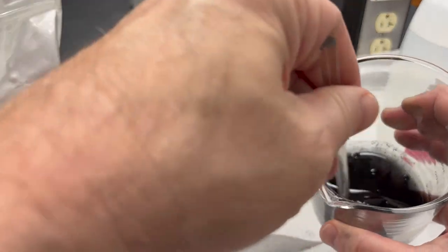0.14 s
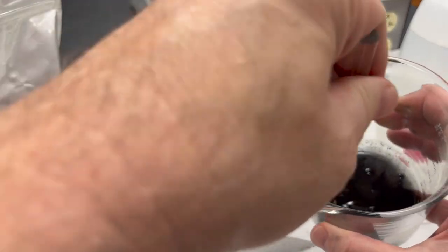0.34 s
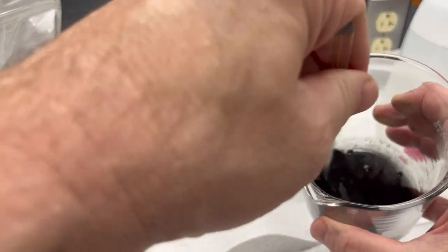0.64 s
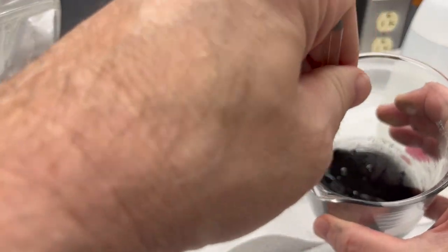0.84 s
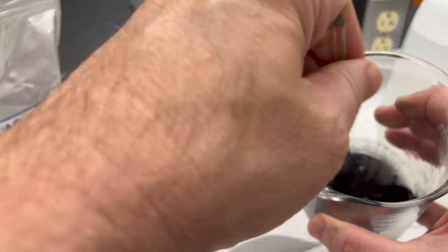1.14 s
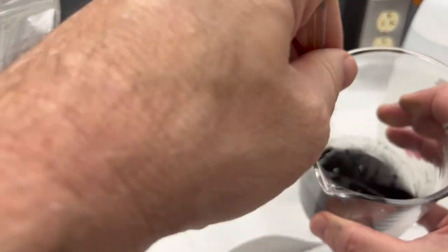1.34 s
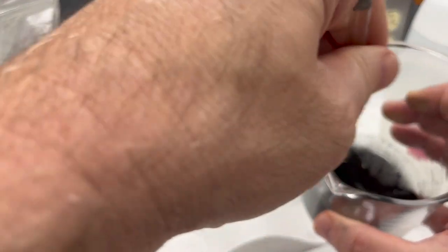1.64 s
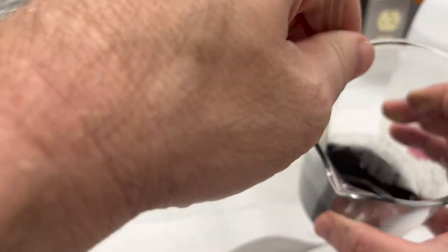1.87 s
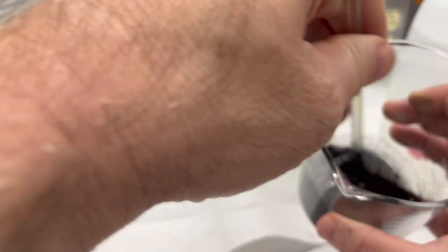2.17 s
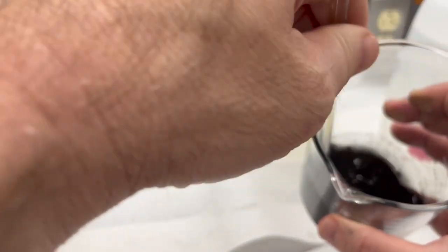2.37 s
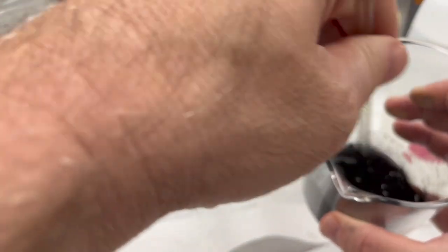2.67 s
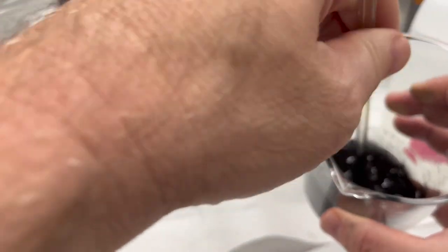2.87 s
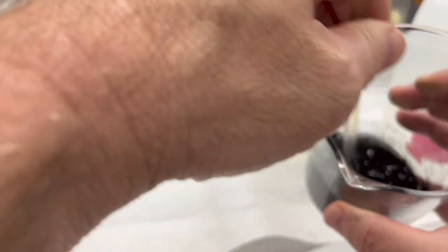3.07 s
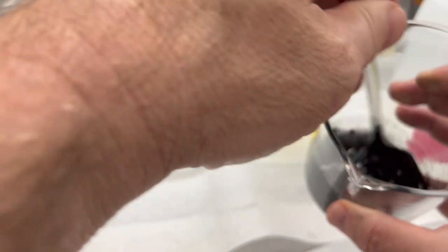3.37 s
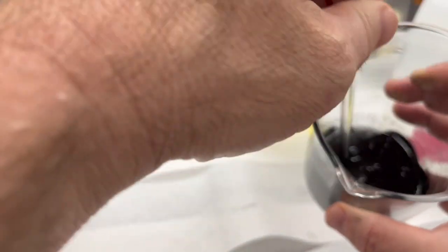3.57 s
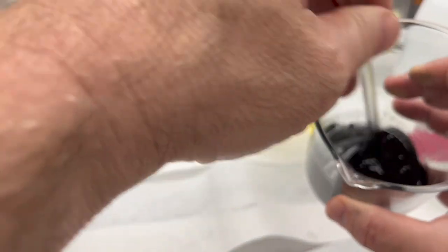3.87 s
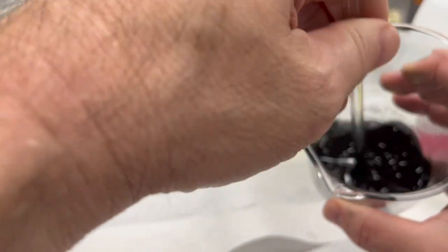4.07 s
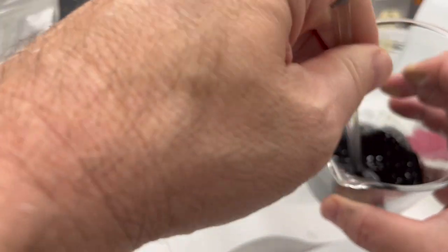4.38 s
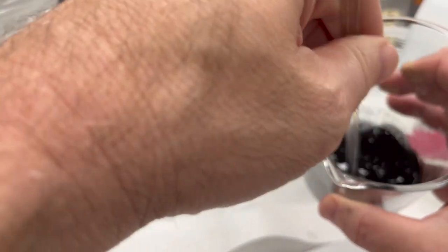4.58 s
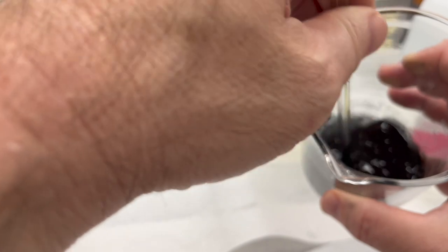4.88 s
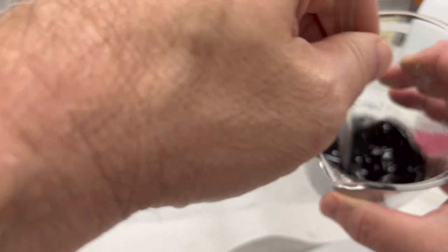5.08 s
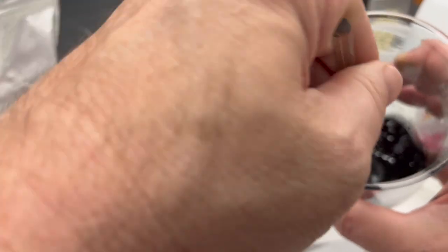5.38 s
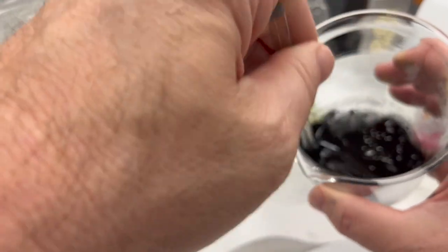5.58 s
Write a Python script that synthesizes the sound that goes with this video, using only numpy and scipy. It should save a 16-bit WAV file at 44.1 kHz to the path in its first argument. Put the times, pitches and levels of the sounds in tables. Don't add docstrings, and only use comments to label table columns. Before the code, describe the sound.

Close up in a hard-walled lab room, a thin metal stirrer barely rubs in oil, with a few faint ticks on a small glass beaker. After a second the clinks become frequent and irregular, then steady pairs of bright taps about four times a second, with soft wet scraping between. They end in a last cluster and a rubbing drag. A phone picks up low ventilation and a weak mains hum behind.

```python
import sys
import numpy as np
from scipy import signal
from scipy.fft import rfft, irfft
from scipy.io import wavfile
from scipy.ndimage import uniform_filter1d

SR = 44100
rng = np.random.default_rng(int(sys.argv[2]) if len(sys.argv) > 2 else 0)


def persist_wave(psi):
    counts = np.round(np.clip(psi, -1, 1) * 32767).astype(np.int16)
    wavfile.write(sys.argv[1], SR, np.atleast_2d(counts).T)


def natural_amplitude(level_db):
    exponent = np.asarray(level_db, float) / 20
    return 10 ** exponent


N = 252252

# f/Hz, time to fall 60 dB/s, left minus right level/dB, left lead/rad
BELL = (623, .15, -7.5, .2)
BELL_SPLIT_HZ, BELL_TWIN = 10.5, 0.9
# f/Hz, time to fall 60 dB/s, level against the bell/dB
THUD = (330, 0.016, -26)


def taps(bell_db=6, swell_s=0.00028, early_s=0.0006, bell_drift=0.009, small_hz=800):
    size, rows = 8192, tap_rows()
    t = np.arange(size) / SR
    swell = (1 - np.exp(-t / swell_s)) ** 2
    hz = (BELL[0] - BELL_SPLIT_HZ / 2) * (1 + bell_drift * rng.standard_normal(len(rows)))
    beating = (1 + BELL_TWIN * np.exp(2j * np.pi * BELL_SPLIT_HZ * t)) / 2
    bell = (rings(hz, *BELL[1:], size) * beating).imag * swell
    thud = rings(np.array([THUD[0]]), THUD[1], 0, 0, size).imag
    bell = bell + natural_amplitude(THUD[2]) * thud
    glass = wall_modes(size=1600)
    clinks, bells = np.zeros((2, 2, N + size))
    for k, (s, ring_db, tap_db, spot) in enumerate(rows):
        start = int((s - early_s) * SR)
        clink = wall(tap_db, spot, *glass)
        bells[:, start:start + size] += natural_amplitude(bell_db + ring_db) * bell[:, k]
        clinks[:, start:start + clink.shape[1]] += clink
    clinks = signal.sosfilt(signal.butter(2, small_hz, "high", fs=SR, output="sos"), clinks)
    return (clinks + bells)[:, :N]


# t/s, wall level/dB, bell level/dB, hardness/dB, ring f/Hz
RIM_TAPS = [
    (0.4031, -34.5, -42, 12, 2620),
    (0.7352, -36, -53, -4, 2640),
    (1.2924, -30, -48.5, -9, 2650),
    (3.379, -23.5, -73, -8.5, 3120),
    (5.5155, -38, -58, 10, 6530),
]
LIP_TAPS = [
    (1.2727, -22, -51, 0, 3060),
    (1.439, -28, -40.5, 11, 2900),
    (1.793, -22, -52, 0, 2860),
    (1.9629, -26.5, -62, 7, 3090),
    (5.119, -31.5, -39, 15, 2680),
]
WET_TAPS = [
    (0.2807, -35.5, -53, -22, 2520),
    (3.1267, -21.5, -34, 0.5, 3100),
    (3.3758, -21, -32, 3, 2350),
    (3.6285, -18.5, -34.5, -1, 3090),
    (4.4315, -14, -29.5, 2.5, 2330),
    (4.66, -21.5, -33.5, -1.5, 3050),
    (4.8911, -21.5, -33.5, 0, 3100),
]
PASTE_TAPS = [
    (1.0886, -46.5, -59, -19.5, 2250),
    (1.6372, -29, -42, -15.5, 3170),
    (1.9687, -23.5, -25.5, 13, 2920),
    (3.8327, -26.5, -38, 0, 2380),
    (4.1288, -24.5, -33, -4.5, 2400),
    (5.0219, -39, -51, -15.5, 3100),
]
LOW_TAPS = [(1.172, -25, -37, -1.5, 3050), (1.6866, -24, -31, 7, 2930), (1.8256, -23.5, -28.5, -10, 2650),
            (2.214, -21.5, -32, 1, 2790), (2.4644, -22.5, -30.5, 1, 3030), (2.7095, -21.5, -35.5, -2, 2640),
            (2.9575, -33, -45, 0.5, 3040), (3.1819, -23.5, -32, -3.5, 3230),
            (3.4046, -23.5, -33.5, -5.5, 6560), (3.6606, -21, -28.5, -0.5, 3040),
            (3.914, -22.5, -32, 0, 2850), (4.2675, -38, -41, -7, 2960), (4.7246, -26, -37, -8.5, 3070),
            (4.9778, -22.5, -30, 3.5, 2640)]
# t/s, wall level/dB, hardness/dB
TOUCHES = [(0.038, -64, -10), (0.811, -76, 15), (0.879, -76, 15), (0.905, -73.5, 13), (0.981, -79, 20),
           (1.037, -91, 4), (1.5834, -49.5, -9), (2.1448, -55, 10), (2.2934, -53, -14), (2.9042, -58, 4),
           (3.0338, -57, 8), (3.267, -49, -2), (3.328, -65, 8), (3.5223, -51.5, -8), (3.5582, -57, 3.5),
           (3.7435, -47.5, -2), (4.2017, -57, -10.5), (4.223, -62, 11), (4.591, -58, -13),
           (4.8282, -63.5, 7)]
TOUCH_BELL_DB, TOUCH_HZ = -11, 3100
# low wall, high wall, rod level against middle wall/dB, left minus right level/dB
SPOT_DB = [
    (-12, 4.5, 2, 1.5),
    (-10, 5, 1, 1.5),
    (-22, -10, -13, 0),
    (-9.5, -7, -14.5, 1.5),
    (-5.5, 2, -2.5, 0),
    (-10, -7, -6.5, 3),
]
# low f/Hz, high f/Hz, rod f/Hz, and its rattle length/ms
SPOT_HZ = [
    (1900, 5770, 9520, 3.3),
    (1600, 4750, 10500, 3.52),
    (2050, 3000, 9500, 3.76),
    (1950, 2600, 9500, 2.74),
    (1500, 4750, 9200, 3.26),
    (2000, 2200, 10000, 2.9),
]
HARDNESS_SHARE = [0.15, 0.11, 0.39, 0.87]


def tap_rows():
    touches = [(s, db, db + TOUCH_BELL_DB, hard_db, TOUCH_HZ) for s, db, hard_db in TOUCHES]
    kinds = RIM_TAPS, LIP_TAPS, WET_TAPS, PASTE_TAPS, LOW_TAPS, touches
    rows = []
    for kind, spot_db, spot_hz in zip(kinds, SPOT_DB, SPOT_HZ):
        low, high, rod, pan_db = spot_db
        low_hz, high_hz, rod_hz, rattle_ms = spot_hz
        for s, db, ring_db, hard_db, hz in kind:
            tap_db = db + np.array([low, 0, high, rod]) + hard_db * np.array(HARDNESS_SHARE)
            rows.append((s, ring_db, tap_db, (low_hz, hz, high_hz, rod_hz, rattle_ms, pan_db)))
    return rows


RING_DB, RING_REACH = 14, 0.09


def wall(tap_db, spot, hz, family, modes, favour_db=3, reach=0.13, chance_db=0.5, turn=0.96, lean_db=-1.2):
    *favoured_hz, rattle_ms, pan_db = spot
    chance = rng.standard_normal((3, len(hz)))
    favour = favour_db * np.exp(-(np.log(hz[:, None] / favoured_hz) / reach) ** 2).max(axis=1)
    favour = favour + RING_DB * np.exp(-(np.log(hz / favoured_hz[1]) / RING_REACH) ** 2)
    share = natural_amplitude(favour + chance_db * chance[0]) * np.exp(1j * turn * chance[1:])
    member = family == np.arange(4)[:, None]
    groups = np.einsum("km,pm,pmt->kpt", member, share, modes, optimize=True).imag
    groups = signal.fftconvolve(groups, chatter(rattle_ms, size=900)[None], axes=2)
    groups = groups / np.sqrt(np.sum(groups ** 2, axis=(1, 2), keepdims=True) / 400)
    pan = natural_amplitude((pan_db + lean_db) * np.array([[0.5], [-0.5]]))
    return np.tensordot(natural_amplitude(tap_db), groups, axes=1) * pan


SCATTER_TOP_HZ = 5000


def chatter(rattle_ms, size, density=0.27, rise_s=0.00096, stretch=0.97, spread_db=3.0,
            scatter_db=-10, scatter_s=0.0057):
    t, chance = np.arange(size) / SR, rng.standard_normal((2, size))
    contacts = (rng.random(size) < density) * np.sign(chance[0]) * natural_amplitude(spread_db * np.abs(chance[0]))
    contacts = contacts * np.exp(-(1000 * t / (stretch * rattle_ms)) ** 4)
    soft = signal.butter(2, SCATTER_TOP_HZ, fs=SR, output="sos")
    tail = natural_amplitude(scatter_db) * np.exp(-t / scatter_s) * signal.sosfilt(soft, chance[1])
    return (contacts + tail)[None] * (1 - np.exp(-t / rise_s))


# f/Hz, level/dB, time to fall 60 dB/s
MODES = [(1010, -9, 0.025), (1435, -1.5, 0.016), (1561, 7.5, 0.01), (1696, -11.5, 0.031),
         (2220, -4.5, 0.0037), (2230, -1.5, 0.004), (2520, 2, 0.015), (2562, -8, 0.075), (2670, 9, 0.12),
         (3060, -8, .018), (3090, 12, 0.012), (3042, 2.5, 0.072), (3940, 0, 0.06), (4370, -10, 0.01),
         (4696, 0.5, 0.02), (4920, -6, 0.03), (5230, -14.5, 0.045), (5910, 3, 0.012), (6510, -8, 0.012),
         (7040, -3, 0.021), (7105, -2, 0.018), (9370, -1.5, 0.0089), (10020, 3, 0.004), (11280, -3, 0.017),
         (13700, -14.5, 0.0067), (13350, 2, 0.019)]
FAMILY_EDGES_HZ = [900, 2050, 4000, 7700, 16000]
# lowest f/Hz, highest f/Hz, level/dB
CROWD = (950, 14800, -8)
CROWD_T60_S, MOST_CYCLES = 0.004, 80
# f/Hz, left minus right level/dB
PORT_BALANCE = [(60, -0.5), (110, 0.0), (200, -0.5), (380, -2.0), (700, -13.5), (1290, -2), (2380, 0),
                (4400, 8), (8120, -8), (15000, -1.5)]
# f/Hz, left lead/rad
PORT_PHASE = [(0, 0), (1890, -0.6), (2410, 0.9), (3960, -0.2), (4570, 0.9), (5510, -3.2), (6030, -2.5),
              (6890, -8.0), (9130, -10.9), (9910, -10.6), (10600, -12.1), (12400, -12.7), (15200, -15.6),
              (16700, -15.8)]


def wall_modes(size, count=36):
    hz, db, t60 = np.transpose(MODES)
    t60 = np.append(np.minimum(t60, MOST_CYCLES / hz), np.full(count, CROWD_T60_S))
    hz = np.append(hz, np.geomspace(*CROWD[:2], count))
    db = np.append(db, np.full(count, CROWD[2]))
    lead = np.interp(hz, *np.transpose(PORT_PHASE))
    ring = rings(hz, t60, on_log(PORT_BALANCE, hz), lead, size)
    family = np.searchsorted(FAMILY_EDGES_HZ[1:-1], hz)
    for k in range(4):
        edges = [0.9 * FAMILY_EDGES_HZ[k], 1.1 * FAMILY_EDGES_HZ[k + 1]]
        band = signal.butter(2, edges, "bandpass", fs=SR, output="sos")
        ring[:, family == k] = signal.sosfilt(band, ring[:, family == k])
    return hz, family, natural_amplitude(db)[:, None] * ring


def rings(hz, t60, balance_db, lead, size):
    ring = np.exp(np.outer(2j * np.pi * hz - np.log(1000) / t60, np.arange(size) / SR))
    side = np.array([[0.5], [-0.5]])
    return (natural_amplitude(side * balance_db) * np.exp(1j * side * lead))[..., None] * ring


# t/s, pressure level/dB, dryness/dB
STIR = [(0.0, -72, -12), (0.13, -78.5, 4), (0.2, -72, 7.5), (0.36, -71, -4.5), (0.561, -91.5, -14.5),
        (0.72, -77.5, 0), (0.8, -77, 16), (1.16, -71, -3.5), (1.309, -70.5, 6.5), (1.89, -63, -1),
        (2.83, -65.5, 1), (3.79, -66, 0), (4.05, -68.5, -8), (4.399, -66, 0.5), (5.15, -67, 1),
        (5.379, -67.5, -4), (5.6, -62, 8), (5.72, -84, -24)]
# f/Hz, width/Hz
SCRAPE_BANDS = [
    (1150, 920),
    (3700, 2600),
    (11300, 3400),
]
# level/dB, share of dryness 0-1
SCRAPE_DB = [
    (-5, 0.15),
    (-1.5, 0),
    (-13.5, 0.91),
]


def scrape(patchy_db=3.5, flutter_db=6.0):
    s, *controls = np.transpose(STIR)
    pressure_db, dry_db = (np.interp(np.arange(N) / SR, s, c) for c in controls)
    out = 0
    for (hz, width_hz), (db, share) in zip(SCRAPE_BANDS, SCRAPE_DB):
        grains = rng.standard_normal((2, N)) * natural_amplitude(2.1 * rng.exponential(size=N))
        band = signal.butter(2, [hz - width_hz / 2, hz + width_hz / 2], "bandpass", fs=SR, output="sos")
        level_db = db + pressure_db + share * dry_db
        gain = natural_amplitude(level_db + patchy_db * walk(8.7) + share * flutter_db * walk(36))
        out = out + gain * unit(signal.sosfilt(band, grains))
    return out


# t/s, length/s, level/dB, f/Hz
DRAGS = [
    (0.153, 0.24, -67.5, 3670),
    (0.066, 0.049, -80, 1950),
    (0.835, 0.28, -73, 1110),
    (2.523, 0.3, -69.5, 1300),
    (4.253, 0.17, -64, 1300),
    (5.198, 0.13, -61, 4540),
    (5.366, 0.17, -64.5, 1180),
    (5.53, 0.11, -64, 4600),
    (5.604, 0.13, -64.5, 1500),
]


def drags(spread=0.2, patchy_db=-1.0):
    out = np.zeros((2, N))
    noise = rng.standard_normal((2, N)) * natural_amplitude(patchy_db * walk(17))
    for s, length, db, hz in DRAGS:
        band = signal.butter(2, [hz * (1 - spread), hz * (1 + spread)], "bandpass", fs=SR, output="sos")
        span = np.arange(int(s * SR), min(int((s + length) * SR), N))
        swell = np.sin(np.pi * (span / SR - s) / length)
        out[:, span] += natural_amplitude(db) * swell * unit(signal.sosfilt(band, noise[:, span]))
    return out


def spray(x, low_hz=1500):
    treble = signal.butter(2, low_hz, "high", fs=SR, output="sos")
    crack = np.abs(signal.sosfilt(treble, x)) * rng.standard_normal(x.shape)
    crack = signal.sosfilt(treble, crack)
    crack = signal.sosfilt(signal.butter(1, 6000, fs=SR, output="sos"), crack)
    return natural_amplitude(-2) * x + natural_amplitude(0.5) * crack


# f/Hz, time to fall 60 dB/s
ROOM_T60 = [(300, 0.13), (1000, 0.4), (3000, 0.3), (6000, 0.29), (10000, 0.4), (15000, 0.28)]
# f/Hz, level against the direct sound/dB
ROOM_DB = [(300, -18.5), (620, -22), (1100, -17), (3000, -14), (6000, -14.5), (8300, -22.5), (10000, -26.5),
           (15000, -28)]


def room(x, gap_s=0.0091, build_s=0.0028):
    t = np.arange(32768) / SR
    tail = 0
    for hz, band in bands(rng.standard_normal((2, len(t))), count=13):
        t60 = on_log(ROOM_T60, hz)
        fade = np.exp(-np.log(1000) * t / t60) / np.sqrt(t60 * SR / 14)
        tail = tail + natural_amplitude(on_log(ROOM_DB, hz)) * band * fade
    tail = tail * (1 - np.exp(-np.maximum(t - gap_s, 0) / build_s))
    return signal.fftconvolve(x, tail, axes=1)[:, :N]


# f/Hz, level per Hz/dB
AIR = [(25, -6.5), (45, -1.5), (85, -4), (125, 1), (240, -3.5), (400, -12.5), (600, -12), (800, -30.5),
       (1500, -31), (3000, -45), (7000, -51.5), (14000, -60)]
# f/Hz, likeness 0-1
AIR_ALIKE = [(30, .92), (130, .88), (300, .7), (700, .45), (1500, .3), (6000, .1)]
AIR_DB, AIR_RISE_DB_PER_S = -53, 0.43
# f/Hz, width/Hz, level/dB
HUM = (120, 1.3, -59.5)


def ventilation(swell_db=-1.7, flicker_db=2.83):
    out, swell = 0, walk(0.27)
    for hz, (mid, side) in bands(rng.standard_normal((2, N)), count=19):
        alike = np.clip(on_log(AIR_ALIKE, hz), 0, 1)
        pair = np.sqrt(1 + alike) * mid + np.sqrt(1 - alike) * side * np.array([[1], [-1]])
        out = out + natural_amplitude(on_log(AIR, hz) + swell_db * swell + flicker_db * walk(2.6)) * pair
    hum = signal.lfilter(*signal.iirpeak(HUM[0], HUM[0] / HUM[1], fs=SR), rng.standard_normal(N))
    air = unit(out) * natural_amplitude(AIR_DB + AIR_RISE_DB_PER_S * np.arange(N) / SR)
    return air + unit(hum) * natural_amplitude(HUM[2])


def dull(x, dip_hz=8250, dip_width_hz=600, top_hz=13800):
    x = signal.lfilter(*signal.iirnotch(dip_hz, dip_hz / dip_width_hz, fs=SR), x)
    return signal.sosfilt(signal.ellip(6, 0.5, 40, top_hz, fs=SR, output="sos"), x)


def on_log(table, hz):
    f, value = np.transpose(table)
    return np.interp(np.log(np.maximum(hz, 1)), np.log(np.maximum(f, 1)), value)


def unit(x):
    return x / np.sqrt(np.mean(x ** 2))


def walk(rate):
    k = int(SR / rate)
    held = np.repeat(rng.standard_normal(N // k + 1), k)
    return uniform_filter1d(uniform_filter1d(held, k), k)[:N]


def bands(x, count):
    size = x.shape[-1]
    spectrum = rfft(x)
    octave = np.log2(np.maximum(np.arange(size // 2 + 1) * SR / size, 1))
    for hz in 16000 / 2 ** (np.arange(count) / 2):
        weight = np.cos(np.pi * np.clip(octave - np.log2(hz), -0.5, 0.5)) ** 2
        yield hz, irfft(spectrum * weight, size)


def scene():
    beaker = taps()
    return beaker + dull(room(spray(beaker)) + scrape() + drags() + ventilation())


def band_limit(x):
    return signal.sosfilt(signal.butter(12, 17140, fs=SR, output="sos"), x)


def record(dry):
    bass = signal.butter(4, 40, "high", fs=SR, output="sos")
    top = signal.butter(12, 14500, fs=SR, output="sos")
    heard = signal.sosfilt(np.vstack([bass, top]), 1.1 * np.tanh(dry))
    return band_limit(heard)


dry = scene()
out = record(dry)
persist_wave(out)
```